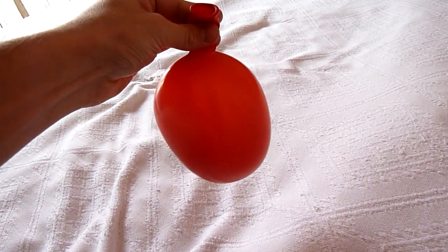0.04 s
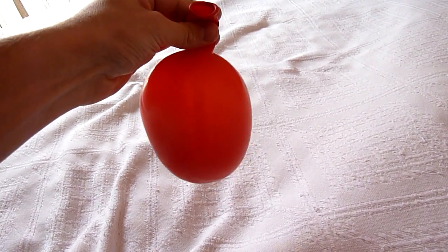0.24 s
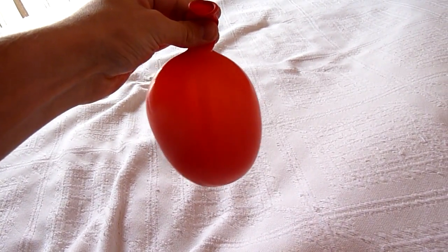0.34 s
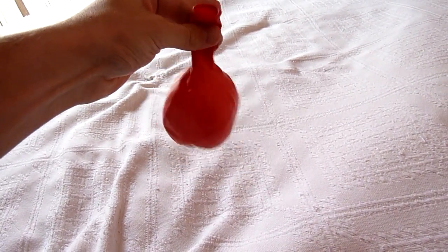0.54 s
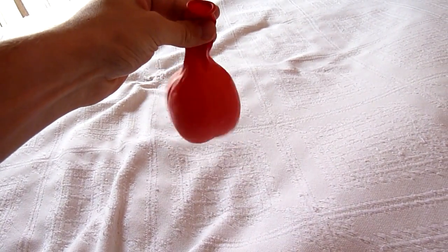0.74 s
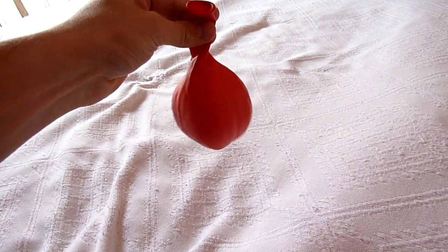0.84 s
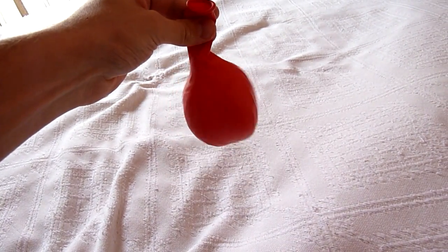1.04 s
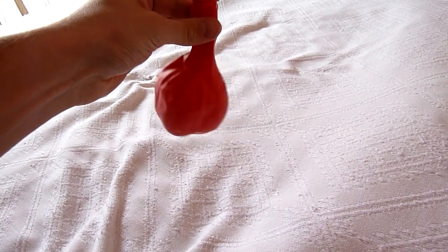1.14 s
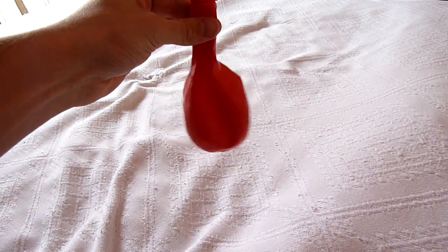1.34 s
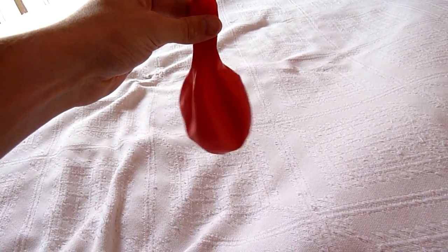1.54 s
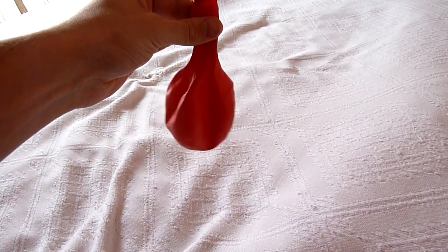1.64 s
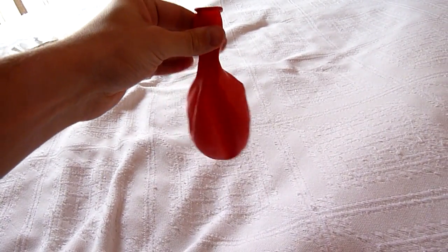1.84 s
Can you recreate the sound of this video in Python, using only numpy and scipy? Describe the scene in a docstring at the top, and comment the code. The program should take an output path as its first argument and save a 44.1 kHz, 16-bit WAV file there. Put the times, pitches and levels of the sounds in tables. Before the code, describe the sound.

A small rubber balloon deflates: air leaks through its pinched neck with a thin, high hiss, then rushes out in one sharp, flapping puff. The quiet room rings briefly, and the limp rubber crinkles faintly in the hand.

```python
"""Letting go of a small balloon

Air leaks through the pinched neck of a rubber balloon with a high hiss. The fingers let go: the
rest of the air leaves in one sharp puff, the neck flaps, and the quiet room rings briefly.
Then the limp rubber crinkles and rubs softly in the hand."""
import sys
import numpy as np
from scipy import signal
from scipy.fft import rfft, irfft
from scipy.io import wavfile

SR = 44100
rng = np.random.default_rng(int(sys.argv[2]) if len(sys.argv) > 2 else 0)


def wav_record(signal):
    """Record a signal, one row per channel, as 16-bit PCM in the file named by sys.argv[1]."""
    frames = np.transpose(np.atleast_2d(signal))
    bounded = np.clip(frames, -1, 1)
    # unit amplitude maps onto the largest positive 16-bit level
    quanta = np.round(bounded * 32767).astype(np.int16)
    wavfile.write(sys.argv[1], SR, quanta)


N = 83790
T = np.arange(N) / SR
HZ = np.maximum(np.arange(N // 2 + 1) * SR / N, 1)

# Envelope of the jet. Each row: time in seconds, level in dB.
JET_ENVELOPE = [(.412, -61), (.429, -36), (.4434, -19.5), (.4442, -14), (.456, -14.5), (.472, -20.5),
                (.493, -22), (.506, -31.5), (.54, -61)]
# Tone of the bright jet and the low gush. Each row: frequency in Hz, relative level in dB.
JET_EQ = [(300, -56), (900, -15.5), (1500, -15.5), (2650, -12), (3200, -5.5), (5900, -6.5), (7500, -9.5),
          (11000, -14), (16000, -21)]
GUSH_EQ = [(90, -46), (160, -10), (260, -7), (400, -4), (1000, -1), (1300, -10), (2000, -1), (3000, -16),
           (8000, -45)]
# Resonances and a notch of the open neck. Each row: centre in Hz, width in Hz, gain in dB.
NECK_PEAKS = [(2080, 77, 4), (3134, 80, 9), (3830, 130, 8.5), (4600, 130, 3), (5120, 250, -4.5),
              (5430, 110, 6.5), (5820, 106, 6)]
# Tiny shrieks. Each row: peak time in seconds, pitch in Hz, level in dB, half-width in seconds.
NECK_SHRIEKS = [(0.4464, 5900, -16, 0.00041), (0.449, 3986, -11.5, 0.0011), (0.4495, 5660, -10, 0.00083),
                (0.4552, 5680, -8.5, .0005), (.4595, 5600, -12.5, 0.00055)]
# Stereo image of puff and rubber. Each row: frequency in Hz, left-right likeness.
BALLOON_IMAGE = [(200, 1), (1500, 1), (5000, 0.94), (9000, 0.78), (15000, 0.79)]

def puff():
    """The neck snaps open and shrieks, a ragged jet escapes, and the collapsing body gushes."""
    jet_tone = from_db(at_hz(JET_EQ) + peaks_db(NECK_PEAKS))
    jet = envelope(JET_ENVELOPE) * noise(jet_tone, BALLOON_IMAGE) * flutter(rate_hz=240, depth_db=1.46)
    shrieks = sum(from_db(db) * swell(s, half_width) * rough_tone(hz, wander_hz=480)
                  for s, hz, db, half_width in NECK_SHRIEKS)
    peak_s, rise_db_per_s, fall_db_per_s = .4615, 973, 407
    gush_db = -20 + np.minimum((T - peak_s) * rise_db_per_s, (peak_s - T) * fall_db_per_s)
    gush = from_db(gush_db) * noise(from_db(at_hz(GUSH_EQ)), BALLOON_IMAGE)
    return jet + shrieks + gush


# Flaps of the neck. Each row: peak time in seconds, level in dB, half-width in seconds.
NECK_FLAPS = [(0.4607, -5.5, 0.00025), (0.4624, -12.5, 0.00016), (0.4687, -9.5, 0.00029),
              (0.4702, -12.5, 0.00023), (0.4802, -16, 0.00016)]
# Ring of the body. Each row: pitch in Hz, level against the flap in dB, decay in seconds.
BALLOON_MODES = [(360, -30, 0.0057), (594, -23, 0.0093), (996, -13, 0.016)]

def flaps():
    """Each flap of the slack neck pushes air, sucks a little back and sets the body ringing."""
    recoil_s, recoil_share = 0.00053, 0.64
    pulses = sum(from_db(db) * (swell(s, half_width) - recoil_share * swell(s + recoil_s, half_width))
                 for s, db, half_width in NECK_FLAPS)
    body = sum(from_db(db + mode_db) * ring(s - half_width, hz, decay_s)
               for s, db, half_width in NECK_FLAPS for hz, mode_db, decay_s in BALLOON_MODES)
    return pulses + body


# Envelopes of the hiss and its airy whistle. Each row: time in seconds, level in dB.
HISS_ENVELOPE = [(0, -33), (.40, -32.5), (.429, -29.5), (.436, -45), (.445, -87)]
WHISTLE_ENVELOPE = [(0, -41.5), (.2, -35), (.32, -33.5), (.415, -33), (.430, -24), (.433, -51), (.44, -93)]
# Tone of the hiss. Each row: frequency in Hz, relative level in dB.
HISS_EQ = [(100, -38.5), (330, -40.5), (500, -20), (800, -24), (1100, -12), (1400, -21.5), (2200, -14.5),
           (2800, -16), (5800, -10), (7500, -17.5), (9200, -3.5), (12000, -5), (15500, -7)]
# Stereo image of the leak. Each row: frequency in Hz, left-right likeness (1 and up is near mono).
LEAK_IMAGE = [(500, 1.5), (3000, 1.5), (7000, 0.5), (15000, 0.85)]
# The leak sits to the left. Each row: frequency in Hz, left over right in dB.
LEAK_PAN = [(700, 2.5), (4400, 1), (8100, 2.6), (15000, 4.7)]

def leak():
    """Turbulence hisses in the pinched neck; the slit's unsteady whistle grows as the grip eases."""
    hiss = envelope(HISS_ENVELOPE) * noise(from_db(at_hz(HISS_EQ)), LEAK_IMAGE)
    hiss *= flutter(rate_hz=100, depth_db=1.0)
    whistle = envelope(WHISTLE_ENVELOPE) * noise(resonance(hz=12350, width_hz=1000), LEAK_IMAGE)
    whistle *= flutter(rate_hz=54, depth_db=1.7)
    return pan(hiss + whistle, LEAK_PAN)


# Resonances of the rubbed skin. Each row: centre in Hz, width in Hz, relative level in dB.
SKIN_MODES = [(276, 123, 2), (478, 54, 4.5), (760, 170, -21)]
# Short drags on the fingers. Each row: peak time in seconds, level in dB.
FINGER_DRAGS = [(1.600, -65), (1.613, -52.5), (1.632, -48.5), (1.65, -54), (1.674, -53.5), (1.689, -52.5),
                (1.711, -49), (1.737, -58), (1.769, -67)]
# Soft bumps. Each row: peak time in seconds, level in dB, pitch in Hz, half-width in seconds.
RUBBER_BUMPS = [(0.784, -48.5, 400, 0.0048), (0.818, -53, 540, .007), (1.136, -50.5, 950, 0.0024),
                (1.152, -55, 450, 0.0036), (1.180, -53.5, 1000, 0.0024), (1.332, -47, 1000, 0.0016),
                (1.362, -49.5, 930, 0.0034)]
# A fold pops out with a falling crinkle.
# Each row: peak time in seconds, level in dB, centre in Hz, half-width in seconds, bandwidth in Hz.
FOLD_CRINKLES = [(1.135, -45, 7000, .0004, 2400), (1.141, -53.5, 5550, .0035, 500),
                 (1.146, -56, 7500, .014, 6000), (1.148, -56, 4600, .003, 500),
                 (1.151, -53.5, 3500, .005, 200)]

def limp_rubber():
    """The empty balloon bumps, crinkles and drags on the fingers."""
    skin_tone = sum(from_db(db) * resonance(hz, width) for hz, width, db in SKIN_MODES)
    strokes = sum(from_db(db) * swell(s, half_width_s=0.0087) for s, db in FINGER_DRAGS)
    drags = strokes * noise(skin_tone, BALLOON_IMAGE)
    bumps = sum(from_db(db) * swell(s, half_width) * rough_tone(hz, wander_hz=220.5)
                for s, db, hz, half_width in RUBBER_BUMPS)
    crinkles = sum(from_db(db) * swell(s, half_width) * noise(resonance(hz, bandwidth), BALLOON_IMAGE)
                   for s, db, hz, half_width, bandwidth in FOLD_CRINKLES)
    return drags + bumps + crinkles


# Tone of the reverb. Each row: frequency in Hz, gain in dB.
REVERB_EQ = [(100, -12), (250, -11.5), (550, -13), (1000, -10.5), (2000, -10), (4000, -12.5), (7000, -8.5),
             (11000, -10), (16000, -15.5)]
# Length of the tail. Each row: frequency in Hz, seconds to fall by 60 dB.
REVERB_T60 = [(150, 0.31), (1000, 0.54), (3500, 0.54), (7000, 0.45), (12000, 0.31), (16000, 0.33)]
# Bright resonances in the tail. Each row: centre in Hz, width in Hz, boost in dB.
REVERB_PEAKS = [(3127, 100, 5), (3780, 150, 4.9)]
# The tail widens toward the treble. Each row: frequency in Hz, left-right likeness.
REVERB_IMAGE = [(550, 1), (1650, 0.92), (5000, 0.32), (15000, .1)]
# Standing waves of the room; close pairs beat. Each row: pitch in Hz, gain in dB.
STANDING_WAVES = [(490, -5.5), (514, -3.5), (760, -6), (861, 2.5), (988, -7.5), (1024, -7), (1075, 6.5)]

def room_reverb(send):
    """Diffuse reflections die away, the mids lasting longest, while standing waves ring."""
    build_s = 0.018
    white, tail = rfft(noise(1, REVERB_IMAGE)), 0
    edges_hz = np.geomspace(60, 18000, 15)
    for low, high in zip(edges_hz, edges_hz[1:]):
        band = irfft(white * (HZ >= low) * (HZ < high), N)
        t60 = at_hz(REVERB_T60, np.sqrt(low * high))
        decay = from_db(-60 * T / t60) * (1 - np.exp(-T / build_s))
        tail = tail + band * decay / np.sqrt(np.sum(decay ** 2))
    tail = irfft(rfft(tail) * from_db(at_hz(REVERB_EQ) + peaks_db(REVERB_PEAKS)), N)
    for hz, db in STANDING_WAVES:
        decay_s = at_hz(REVERB_T60, hz) / np.log(1000)
        tail = tail + from_db(db) * ring(0, hz, decay_s) * 2 / (decay_s * SR)
    return signal.fftconvolve(tail[:, :N // 2], send.mean(axis=0)[None], axes=1)[:, :N]


# Tone of the background. Each row: frequency in Hz, relative level in dB.
BED_EQ = [(60, -26), (110, -25), (170, -16), (250, -10), (450, -5.5), (750, -7.5), (1800, -14),
          (3700, -15.5), (9000, -20.5), (15000, -27.5)]
# Its stereo image, out of phase in the mids. Each row: frequency in Hz, left-right likeness.
BED_IMAGE = [(130, 0.3), (290, 0.073), (640, -0.51), (1400, -0.72), (3100, -0.54), (15000, 0.14)]

def background():
    """A faint, wide bed of steady noise."""
    return from_db(-56) * noise(from_db(at_hz(BED_EQ)), BED_IMAGE)


def from_db(db):
    """Decibels to gain."""
    return 10 ** (np.asarray(db) / 20)


def at_hz(points, hz=HZ):
    """Read a table on a log-frequency axis."""
    frequencies, values = np.transpose(points)
    return np.interp(np.log(hz), np.log(frequencies), values)


def envelope(points):
    """Gain over time, gated from 30 ms before the first point to the last."""
    s, db = np.transpose(points)
    return from_db(np.interp(T, s, db)) * (T >= s[0] - .03) * (T <= s[-1])


def swell(peak_s, half_width_s):
    """A bell-shaped envelope; its half-width is one standard deviation."""
    return np.exp(-.5 * ((T - peak_s) / half_width_s) ** 2)


def resonance(hz, width_hz):
    """Gain of a steep-sided resonance at every frequency."""
    return 1 / (1 + ((HZ ** 2 - hz ** 2) / (HZ * width_hz * np.sqrt(2))) ** 2)


def peaks_db(table):
    """An EQ curve in dB made of peaks and notches."""
    return sum(db * resonance(hz, width) for hz, width, db in table)


def noise(tone, image):
    """Stereo noise with a given tone and left-right likeness; its mid channel has unit rms."""
    likeness = np.clip(at_hz(image), -.8, .999)
    mid, side = rfft(rng.standard_normal((2, N))) * tone
    mid, side = irfft(mid, N), irfft(side * np.sqrt((1 - likeness) / (1 + likeness)), N)
    return np.array([mid + side, mid - side]) / np.std(mid)


def pan(x, table):
    """Tip the balance to the left by so many dB at each frequency."""
    return irfft(rfft(x) * from_db(at_hz(table) * np.array([[.5], [-.5]])), N)


def drift(rate_hz):
    """Smooth random modulation of unit rms."""
    wander = irfft(rfft(rng.standard_normal(N)) / (1 + (HZ / rate_hz) ** 2), N)
    return wander / np.sqrt(np.mean(wander ** 2) + 1e-20)


def flutter(rate_hz, depth_db):
    """A randomly wavering gain."""
    return from_db(depth_db * drift(rate_hz))


def rough_tone(hz, wander_hz):
    """A tone of unit rms whose pitch wanders quickly, as slack rubber does."""
    return np.sqrt(2) * np.sin(2 * np.pi * np.cumsum(hz + wander_hz * drift(wander_hz)) / SR)


def ring(start_s, hz, decay_s):
    """A struck, damped vibration."""
    age = np.maximum(T - start_s, 0)
    return np.sin(2 * np.pi * hz * age) * np.exp(-age / decay_s)


# Placement of puff, flaps and rubber. Each row: frequency in Hz, left over right in dB.
BALLOON_PAN = [(550, -1), (1650, 0.4), (5000, 3), (15000, 3)]

def scene():
    """The leak, the puff and the limp rubber in the room, over a faint background."""
    # A source this small radiates little bass.
    bass_cut = signal.butter(4, 255, "high", fs=SR, output="sos")
    burst = signal.sosfilt(bass_cut, puff() + flaps())
    handling = signal.sosfilt(bass_cut, limp_rubber())
    hiss = leak()
    bed = background()
    reverb = room_reverb(hiss + burst + from_db(0.5) * handling)
    return hiss + pan(burst + handling, BALLOON_PAN) + reverb + bed


def record(dry):
    """Clip the highest peaks, then cut the top above 15.8 kHz."""
    top_cut = signal.firwin(301, 15800, fs=SR)
    return signal.fftconvolve(np.clip(dry, -.92, .92), top_cut[None], "same", axes=1)


dry = scene()
out = record(dry)
wav_record(out)
```